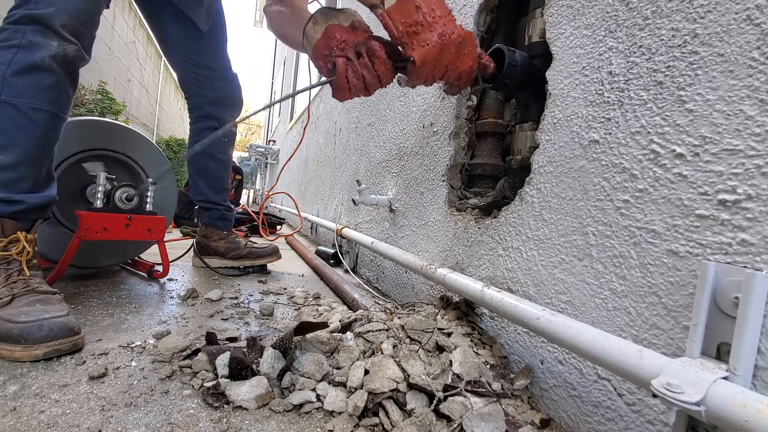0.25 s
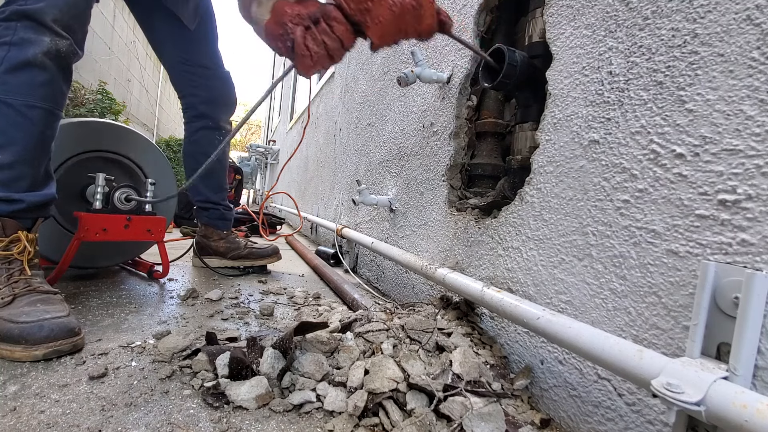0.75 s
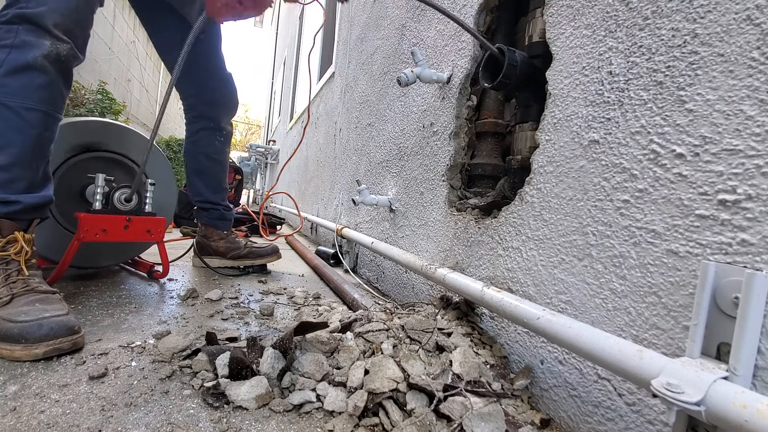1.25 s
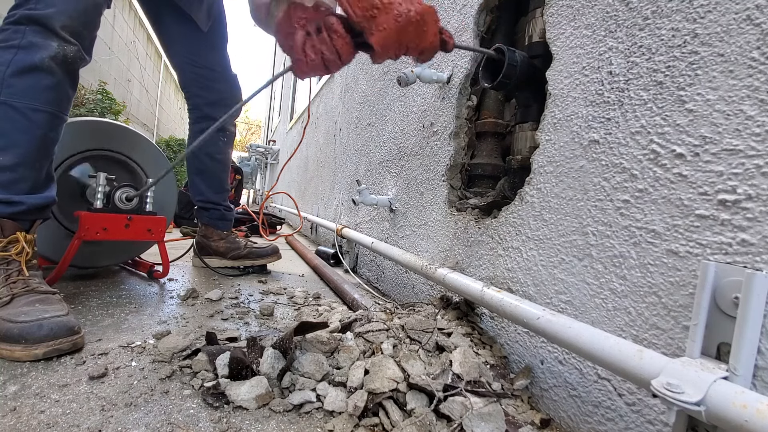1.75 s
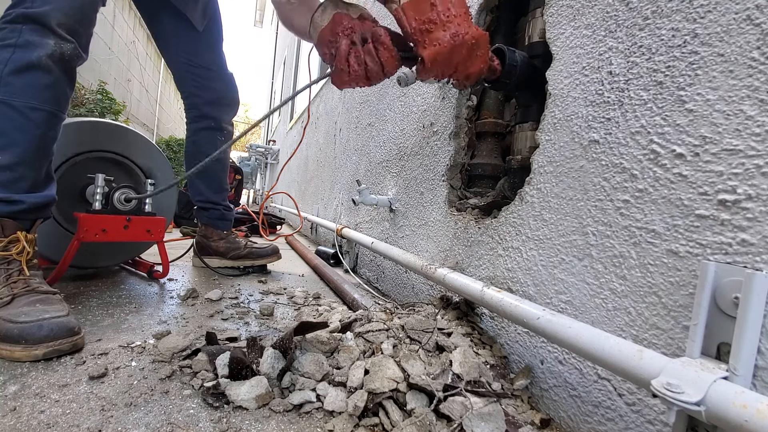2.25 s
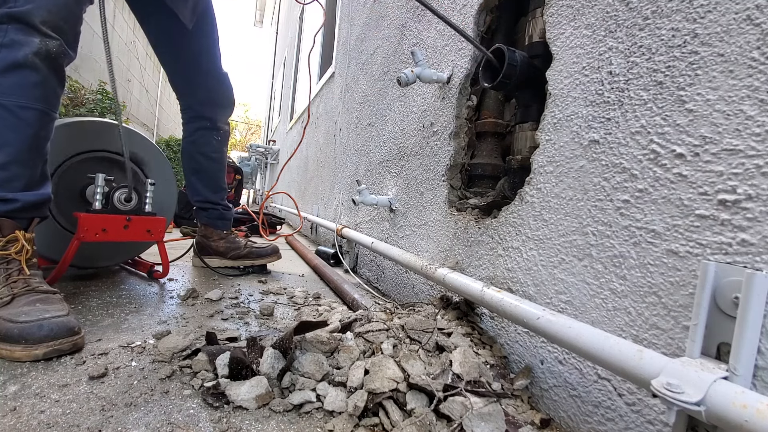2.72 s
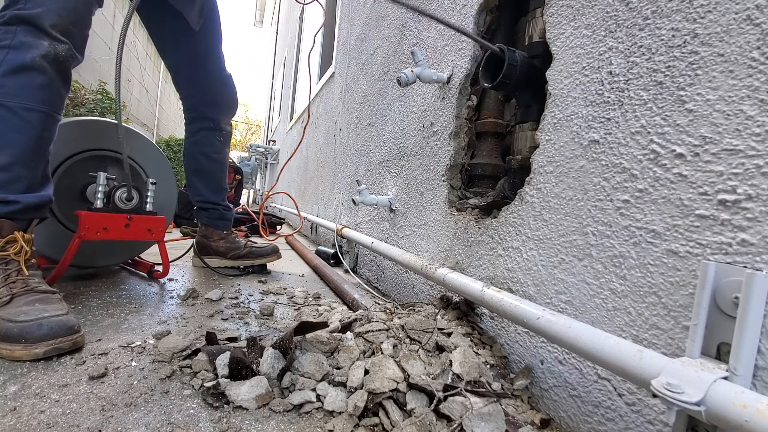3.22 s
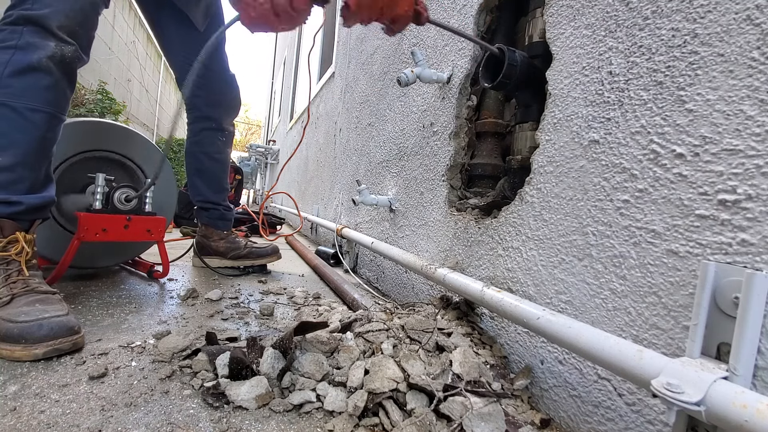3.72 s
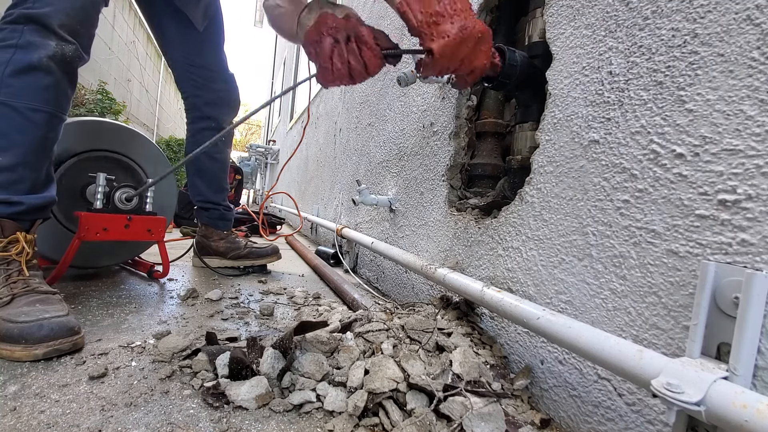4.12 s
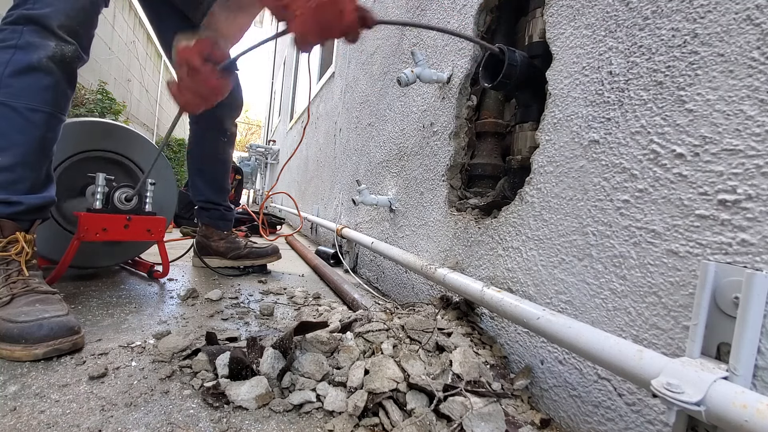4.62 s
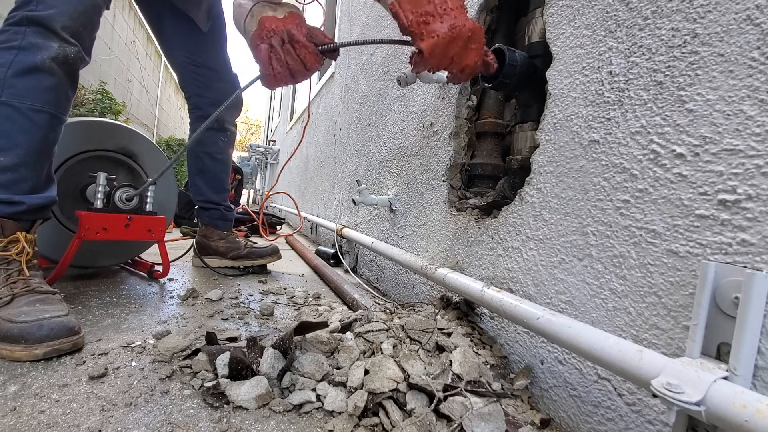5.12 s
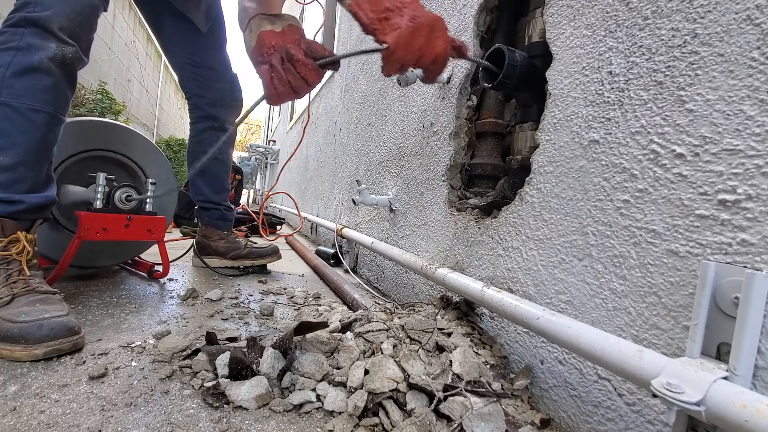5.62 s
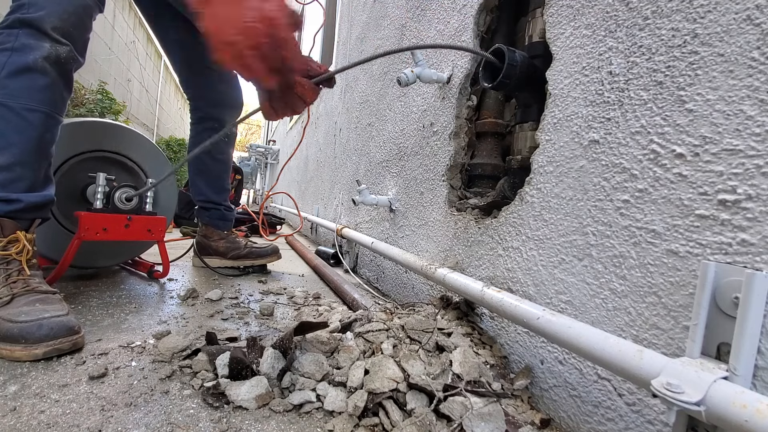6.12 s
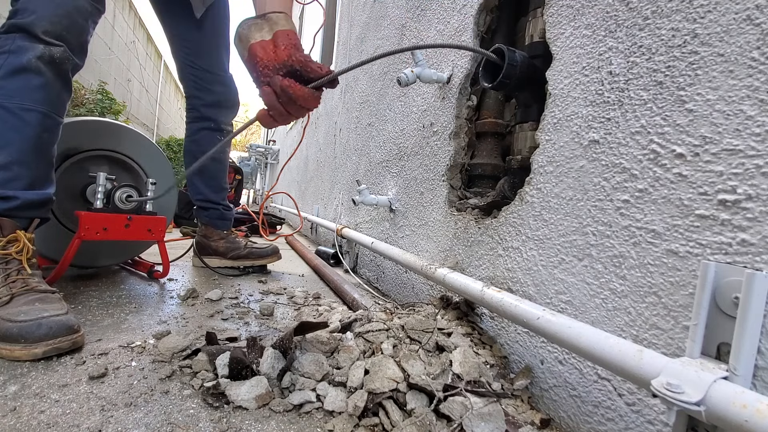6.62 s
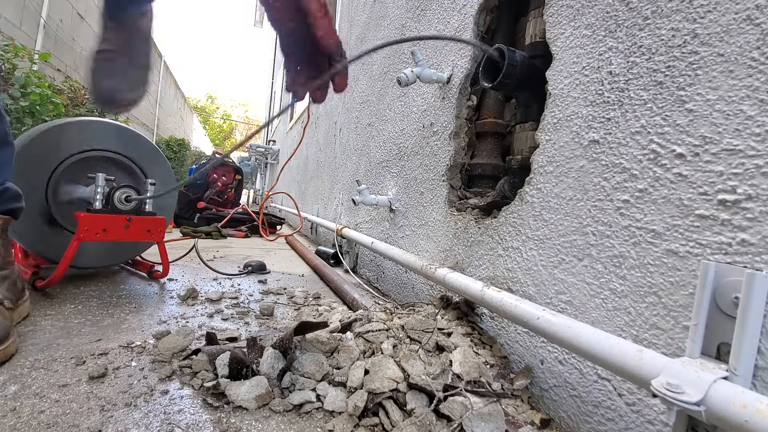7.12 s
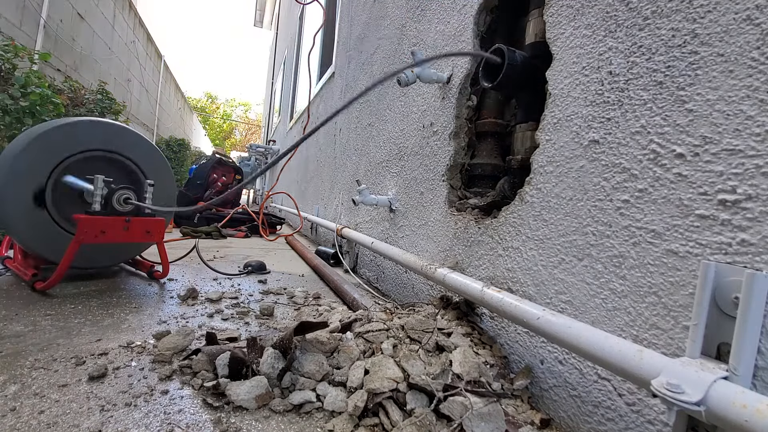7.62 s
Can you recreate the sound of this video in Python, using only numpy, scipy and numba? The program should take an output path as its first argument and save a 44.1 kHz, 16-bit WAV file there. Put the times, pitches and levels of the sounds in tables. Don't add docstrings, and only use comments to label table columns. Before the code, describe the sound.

Outdoors beside a hard wall, a drain-cleaning drum hums low with hollow knocks. Its cable buzzes quickly against a plastic pipe, then scrapes and taps. A second, shorter and higher zip follows, with more grinding. Later, rubber gloves scuff along the cable, bright ticks and gritty snaps sound, and an engine passes softly near the end. Close stereo microphone, short reflections.

```python
import sys
import numpy as np
from scipy import signal
from scipy.fft import rfft, irfft, next_fast_len
from scipy.io import wavfile
from scipy.ndimage import uniform_filter1d
from numba import njit

SR = 44100
rng = np.random.default_rng(int(sys.argv[2]) if len(sys.argv) > 2 else 0)


def wav_record(signal):
    frames = np.transpose(np.atleast_2d(signal))
    bounded = np.clip(frames, -1, 1)
    quanta = np.round(bounded * 32767).astype(np.int16)
    wavfile.write(sys.argv[1], SR, quanta)


def invert_db(level):
    return 10 ** (np.asarray(level, dtype=float) / 20)


N = 346273
T = np.arange(N) / SR


def unit(x):
    return x / np.sqrt(np.mean(x ** 2))


def through(x, response):
    size = next_fast_len(N + SR // 4)
    hz = np.arange(1, size // 2 + 2) * SR / size
    return unit(irfft(rfft(x, size) * response(hz), size)[..., :N])


def curve(f, shape):
    hz, value = np.transpose(shape)
    return np.interp(np.log(f), np.log(hz), value)


def colour(x, shape):
    return through(x, lambda f: invert_db(curve(f, shape)))


def mode(f, hz, width):
    return 1j * f * width / (hz ** 2 - f ** 2 + 1j * f * width)


def steep_modes(f, *rows):
    return sum(gain * mode(f, hz, width) ** 2 for gain, hz, width in rows)


@njit
def svf(x, hz, width):
    y, b, l = np.empty(len(x)), 0., 0.
    g, k = np.tan(np.pi * hz / SR), width / hz
    for i in range(len(x)):
        v = (b + g * (x[i] + 1e-18 - l)) / (1 + g * (g + k))
        b, l, y[i] = 2 * v - b, l + 2 * g * v, k * v
    return y


def noise():
    return rng.standard_normal(N)


def pair(own):
    return unit(noise() + own * rng.standard_normal((2, N)))


def walk(rate):
    k = int(SR / rate)
    held = np.repeat(rng.standard_normal(N // k + 1), k)
    return 1.3 * uniform_filter1d(uniform_filter1d(held, k), k)[:N]


def grit(rate, spread_db):
    size = np.minimum(rng.exponential(size=N), 2.5)
    return unit((rng.random(N) < rate / SR) * invert_db(spread_db * size))


def tone(hz, db, waver, swing_db):
    phase = np.cumsum(hz * (1 + waver * walk(22))) / SR
    return np.sqrt(2) * np.sin(2 * np.pi * phase) * invert_db(db + swing_db * walk(15))


def pings(events, rise_s, t60):
    out = np.zeros(N + SR)
    t = T[:SR // 5]
    for s, db, hz in events:
        start = int(s * SR)
        decay = invert_db(db - 60 * t / t60)
        out[start:start + len(t)] += decay * np.sin(2 * np.pi * hz * t) * np.minimum(t / rise_s, 1)
    return out[:N]


def bursts(times, dbs, hold_s, t60, rise_s):
    out = np.zeros(N + SR)
    t = T[:SR // 8]
    shape = np.minimum(t / rise_s, 1) * invert_db(-60 * np.maximum(t - hold_s, 0) / t60)
    for s, db in zip(times, dbs):
        start = int(s * SR)
        out[start:start + len(t)] += invert_db(db) * shape
    return out[:N]


def strokes(times, lengths, first_db, last_db):
    grip_db_per_s, let_go_db_per_s = 923, 634
    out = np.zeros(N)
    for s, length, a, b in zip(times, lengths, first_db, last_db):
        span = slice(max(int((s - .1) * SR), 0), int((s + length + .1) * SR))
        t = T[span] - s
        edges = grip_db_per_s * np.maximum(-t, 0) + let_go_db_per_s * np.maximum(t - length, 0)
        out[span] += invert_db(np.interp(t, [0, max(length, 1 / SR)], [a, b]) - edges)
    return out


def place(x, pan_db, lag, wet_db, reach_s):
    x = x * np.ones((2, 1)) * invert_db(np.array([[.5], [-.5]]) * pan_db)
    t = T[:int(.06 * SR)]
    echoes = rng.standard_normal((2, len(t))) * np.exp(-t / reach_s) * (t > .0006)
    echoes *= invert_db(wet_db) / np.sqrt(np.sum(echoes ** 2, axis=1, keepdims=True))
    echoes[0, lag] += 1
    echoes[1, 0] += 1
    return signal.fftconvolve(x, echoes, axes=1)[:, :N] / np.sqrt(1 + invert_db(2 * wet_db))


# time_s, drum_shake_db, motor_load_db
MACHINE_LOAD = [(0.0, -32.5, -48), (0.83, -27.5, -26.5), (0.89, -48, -43), (1.16, -37, -28),
                (2.21, -27.5, -51), (2.51, -28, -32), (2.64, -62, -43), (3.8, -26, -27), (3.98, -30.5, -41),
                (4.94, -36, -32), (5.14, -43, -62), (5.53, -32.5, -28.5), (6.34, -28.5, -37),
                (6.45, -28, -26), (6.58, -30, -34.5), (7.17, -29, -34), (7.5, -22.5, -30.5),
                (7.8, -30, -35)]
# time_s, firing_hz, firing_db, exhaust_hz, exhaust_db
PASSING_ENGINE = [
    (6.75, 113.2, -38, 205.4, -58),
    (6.9, 110.5, -35, 210.1, -46),
    (7.18, 109.7, -26.5, 227.9, -37.5),
    (7.299, 108.8, -28.5, 235, -34.5),
    (7.37, 99, -41, 238, -36),
    (7.44, 98, -36, 227.3, -30),
    (7.52, 101.8, -32, 225.3, -39.5),
    (7.62, 101.1, -26, 219.2, -31),
    (7.85, 97.6, -44, 221, -51),
]


def machine():
    s, *levels = np.transpose(MACHINE_LOAD)
    frame_db, mains_db = (np.interp(T, s, db) for db in levels)
    out = tone(69., frame_db - 11, waver=.05, swing_db=3.5)
    out = out + tone(120., mains_db - 9, waver=.04, swing_db=4.0)
    out = out + unit(svf(noise(), 66.1, 14.0)) * invert_db(frame_db - 3.0)
    out = out + unit(svf(noise(), 117.7, 14.6)) * invert_db(mains_db - 4.0)
    s, firing_hz, firing_db, exhaust_hz, exhaust_db = np.transpose(PASSING_ENGINE)
    for hz, db in ((firing_hz, firing_db), (exhaust_hz, exhaust_db)):
        out = out + tone(np.interp(T, s, hz), np.interp(T, s, db, left=-200), waver=.013, swing_db=2.)
    overtone_db = np.interp(T, s, exhaust_db, left=-200) - 8.0
    return out + tone(2 * np.interp(T, s, exhaust_hz), overtone_db, waver=.05, swing_db=4.0)


# freq_hz, density_db (per Hz)
YARD_TONE = [(12, -39), (20, -18.5), (71, 0.5), (94, -5), (156, -11.5), (314, -11), (404, -21),
             (566, -22.5), (652, -22), (1320, -38.5), (1430, -34.5), (2440, -42.5), (7730, -59),
             (15200, -46.5), (16500, -65)]
# freq_hz, likeness (1 = same left and right)
YARD_LIKENESS = [(60, 1), (130, 1), (290, 0.79), (640, 0.13), (1410, 0.0081), (3100, -0.086), (6820, 0.88),
                 (15000, -0.14)]
# time_s, swell_db
YARD_SWELL = [(0, 9.5), (.6, 8.5), (1.5, 9), (1.8, 16.5), (2.2, 0.5), (2.9, -2.5), (3.7, 12), (4.2, 8),
              (5.1, 3.5), (5.6, 10.5), (6.3, 11.5), (7, 12), (7.55, 16), (7.85, 9)]
RUMBLE_SHARE = 0.28


def yard():
    street_db = np.interp(T, *np.transpose(YARD_SWELL))
    rumble_db = RUMBLE_SHARE * street_db
    out, flutter = 0, walk(14)
    for hz in 24 * 2 ** np.arange(0, 9.5, .5):
        mid, side = (unit(svf(svf(noise(), hz, hz / 2), hz, hz / 2)) for _ in range(2))
        like = np.clip(-.12 + curve(hz, YARD_LIKENESS), -.9, .99)
        if hz < 650:
            swell_db = rumble_db * min(hz / 300, 1)
        else:
            swell_db = street_db * np.clip(1.2 - hz / 9000, 0, 1)
        band_db = curve(hz, YARD_TONE) + 10 * np.log10(hz)
        band = np.sqrt(1 + like) * mid + np.sqrt(1 - like) * side * np.array([[1], [-1]])
        out = out + invert_db(band_db + swell_db + 1.72 * walk(8.2) + 1.7 * flutter) * band
    return out * invert_db(-58.5)


# start_s, length_s, hiss_db, body_db
SCUFF_STROKES = [(0, 0.0096, -44.5, -34), (1.908, 0.025, -35, -36), (1.938, 0.062, -75, -42),
                 (4.321, 0.007, -52, -40), (4.355, 0.0051, -39.5, -35), (4.374, 0.029, -47.5, -46.5),
                 (4.42, 0.06, -39.5, -37), (4.549, 0.021, -32.5, -35), (4.606, 0.032, -31.5, -31.5),
                 (4.642, 0.027, -26, -28.5), (4.674, 0.058, -35, -32.5), (4.749, 0.026, -32, -32),
                 (4.779, 0.095, -40, -33.5), (5.606, 0.2, -53, -46.5), (6.709, 0.034, -28.5, -48),
                 (6.759, .01, -36, -59), (6.934, 0.0077, -46, -46), (6.976, .003, -58, -50),
                 (7.359, 0.019, -40, -52), (7.393, .008, -38, -39), (7.426, .02, -45, -58),
                 (7.495, 0.02, -41.5, -49), (7.721, 0.03, -43, -43), (7.784, 0.026, -59, -60),
                 (7.845, .01, -34.5, -56)]
# freq_hz, density_db (per Hz)
HISS_TONE = [(1470, -9), (2500, -2), (3550, -1), (4910, -2), (5390, 1.5), (7890, -1.5), (13400, -3),
             (16000, -7)]
# freq_hz, density_db (per Hz)
SCRAPE_TONE = [(88, -55), (150, -8.5), (328, 1), (382, -10), (531, -4.5), (689, -8), (1430, -16.5),
               (1850, -18.5), (3170, -28), (4000, -24), (5200, -35), (8800, -120)]


def scuffs():
    s, length, hiss_db, body_db = np.transpose(SCUFF_STROKES)
    hiss = colour(grit(4000, spread_db=0.5) * pair(own=0.97), HISS_TONE)
    hiss = hiss * strokes(s, length, hiss_db, hiss_db) * invert_db(3.0 + 2.07 * walk(110))
    body = colour(grit(3000, spread_db=2.0) * pair(own=0.74), SCRAPE_TONE)
    body = body * strokes(s, length, body_db, body_db) * invert_db(7.0 + 2.0 * walk(60))
    return hiss + body


# start_s, peak_db, pitch_hz
DRUM_KNOCKS = [(0.309, -23, 305), (0.385, -22, 200), (0.442, -20, 220), (0.923, -14, 283),
               (1.092, -21, 298), (1.863, -17.5, 298), (2.173, -22.5, 307), (2.405, -28, 298.4),
               (2.441, -31, 246.6), (2.738, -18.5, 234), (2.982, -18, 189), (3.215, -24, 317),
               (3.408, -25, 298), (3.632, -17, 246), (3.689, -25, 251), (3.876, -16.5, 313),
               (4.043, -18, 342), (4.432, -20, 290), (4.603, -18, 275), (4.623, -24, 288),
               (4.643, -14, 290), (4.655, -21, 388), (4.695, -21, 310), (4.899, -28, 285),
               (.002, -19.5, 248), (.012, -19, 320), (.198, -25, 320), (.272, -23, 350), (.475, -22, 350),
               (.55, -22, 262), (2.512, -11.5, 242), (2.537, -11.5, 269), (3.7, -15, 140),
               (3.745, -11.5, 140), (4.666, -9, 331), (4.753, -18, 250), (5.084, -30, 231),
               (5.119, -22, 249), (5.288, -26, 288), (5.509, -21.5, 330), (5.589, -23, 261),
               (5.951, -20.5, 304), (6.282, -21.5, 327), (7.316, -22, 229), (7.585, -22, 216.3)]
# start_s, peak_db
DRUM_CLUNKS = [(0.067, -23.5), (.004, -25), (.095, -26), (.19, -27), (.21, -31), (.31, -26.5), (.54, -30),
               (.585, -30), (4.575, -16.5), (7.53, -23.5), (0.411, -20.5), (.636, -30), (.908, -21),
               (1.697, -17), (1.793, -17.5), (1.907, -21.5), (2.06, -20.5), (2.177, -22.5), (2.24, -23.5),
               (2.473, -38), (2.519, -15), (2.713, -31), (3.069, -24.5), (3.724, -28), (4.208, -23.5),
               (4.328, -33), (4.549, -12.5), (5.21, -21.5), (7.47, -21.5), (7.55, -23), (7.6, -23),
               (7.67, -26)]


def knocks():
    rumble_db = RUMBLE_SHARE * np.interp(T, *np.transpose(YARD_SWELL))
    clunks = [(s, db, 532 + 20 * rng.standard_normal()) for s, db in DRUM_CLUNKS]
    lumps = grit(150, spread_db=2.3) * noise() * invert_db(.6 * rumble_db)
    shell = through(lumps, lambda f: steep_modes(f, (1, 292, 153), (0.86, 509, 106), (0.5, 404, 55)))
    low_rings = pings(DRUM_KNOCKS, rise_s=0.0031, t60=0.062) * invert_db(0.5)
    upper_rings = pings(clunks, rise_s=0.0019, t60=0.066) * invert_db(1.0)
    return low_rings + upper_rings + shell * invert_db(-39.5)


# start_s, peak_db, low_part_db
TURN_TICKS = [(.074, -35.5, -56.5), (.1974, -35, -51), (0.319, -31.5, -65), (1.13, -31, -48),
              (1.359, -34, -53), (1.4756, -32, -48), (1.5873, -40, -43), (1.698, -30.5, -28),
              (1.794, -35, -29), (2.145, -37, -68), (2.26, -27, -38), (2.3775, -40, -63),
              (3.313, -26.5, -31.5), (3.433, -26, -37), (3.5378, -24.5, -23.5), (3.6504, -21, -26),
              (3.764, -23.5, -24), (3.977, -28, -31), (4.0924, -25, -50), (4.2034, -26, -42),
              (4.434, -22.5, -25), (4.97, -33, -44), (5.084, -30, -46), (5.2022, -30.5, -39),
              (6.109, -20, -23), (6.2206, -17.5, -33), (6.335, -23.5, -43), (6.446, -30.5, -37),
              (6.5365, -39, -52)]
# start_s, peak_db
STRAY_SNAPS = [(.625, -41), (1.997, -32.5), (3.172, -33), (4.067, -33.5), (4.6024, -32), (5.934, -34.5),
               (5.953, -39), (6.145, -39), (6.411, -40), (6.684, -23), (6.7864, -45), (6.8205, -25.5),
               (6.88, -29.5), (6.697, -19.5), (6.723, -24), (6.738, -28), (6.802, -35), (6.926, -36),
               (6.939, -27.5), (6.9716, -36), (7.348, -31), (7.383, -24.5), (7.4347, -34), (7.725, -37),
               (7.775, -26.5), (7.789, -33), (7.8187, -43), (6.393, -41), (6.255, -38), (7.843, -30),
               (4.6206, -18), (.089, -37), (.6503, -50), (.672, -40), (.6777, -33), (.7132, -36),
               (.7501, -34), (.7745, -30), (.551, -44), (.396, -47), (.512, -46), (2.5126, -14.5),
               (4.542, -28.5), (1.897, -27), (1.548, -42), (1.815, -30), (3.22, -35)]
# freq_hz, density_db (per Hz)
TICK_TONE = [(2060, -64), (3500, -10.5), (4750, -3), (5440, 0), (7010, -5), (11100, -6), (12700, -8),
             (14000, -5), (16500, -12)]
# pitch_hz, under_tap_db
CABLE_RINGS = [(5380, -4), (6200, -15), (3485, -11.5)]


def ticks():
    snaps = [(s, db, db - 0.5) for s, db in STRAY_SNAPS]
    s, db, low_db = np.transpose(TURN_TICKS + snaps)
    bright = colour(pair(own=1.0), TICK_TONE) + 0.18 * unit(svf(noise(), 5900.0, 300.))
    low = unit(svf(noise(), 1880.0, 2700.0))
    ring_events = [(at, peak_db + under_db, hz)
                   for at, peak_db, _ in TURN_TICKS for hz, under_db in CABLE_RINGS]
    rings = pings(ring_events, rise_s=0.0015, t60=0.026)
    stray_time, stray_level = rng.random((170, 2)).T
    faint = bursts(stray_time * T[-1], -64.0 + 10.0 * stray_level, hold_s=0.004, t60=0.03, rise_s=0.002)
    tap_gain = bursts(s, db - 5.5, hold_s=0.0022, t60=0.031, rise_s=0.00067) + faint
    low_gain = bursts(s, low_db - 5.5, hold_s=0.0021, t60=0.046, rise_s=0.0035) + 3.37 * faint
    return bright * tap_gain + rings + low * low_gain


# pitch_hz, width_hz, level_db, left_minus_right_db
PIPE_MODES = [ (775, 130, 1.5, -2), (915, 170, -4, -2), (1070, 170, -9, -2), (1660, 260, -7.5, -2),
              (1930, 170, -6.5, -2), (2150, 300, -6, -2), (3570, 240, -13, -7), (3850, 230, -5.5, -8),
              (2700, 300, -17, 8), (4640, 490, -17.5, -9.5), (6200, 1100, -18, -11),
              (7560, 190, -18.5, -19), (9010, 210, -14, -2), (11100, 180, -25, -6), (12500, 360, -27, -4),
              (15600, 400, -24, 2), ]


def ring_pipe(x, widen):
    sides = np.array([[.5], [-.5]])

    def response(f):
        total = 0
        for k, (hz, width, db, pan_db) in enumerate(PIPE_MODES):
            total = total + (-1) ** k * invert_db(db + sides * pan_db) * mode(f, hz, widen * width) ** 2
        return total

    return through(x * np.ones((2, 1)), response)


# time_s, coil_rate_hz, pressure_db
FIRST_PUSH = [
    (.64, 75, -55),
    (.665, 80, -34),
    (.72, 86, -27),
    (.772, 104, -30.5),
    (.79, 118, -24),
    (.875, 168, -21.5),
    (.928, 151, -22.5),
    (1.045, 160, -26),
    (1.07, 150, -55),
]
# time_s, coil_rate_hz, pressure_db
SECOND_PUSH = [
    (2.431, 110, -26),
    (2.49, 150, -22),
    (2.525, 236, -21),
    (2.603, 384, -22.5),
    (2.632, 378, -21),
    (2.662, 296, -22.5),
    (2.708, 304, -23.5),
    (2.757, 252, -25.5),
    (2.79, 230, -48),
]
# freq_hz, density_db (per Hz)
RASP_TONE = [(2000, -11), (3000, -17), (3840, -3), (5210, -13.5), (6190, -7.5), (12600, -16.5),
             (13400, -23), (14900, -22), (15600, -14)]


def pushes():
    s, hz = np.transpose(FIRST_PUSH + SECOND_PUSH)[:2]
    hz = np.interp(T, s, hz)
    pressure = 0
    for push in (FIRST_PUSH, SECOND_PUSH):
        push_s, _, push_db = np.transpose(push)
        pressure = pressure + invert_db(np.interp(T, push_s, push_db, left=-200, right=-200))
    octaves = np.log2(hz / 150)
    unsteady = .014 + .09 * np.clip(-octaves, 0, 1)
    phase = np.cumsum(hz * (1 + unsteady * walk(90))) / SR
    coil = phase.astype(int)
    bumps = unit(np.diff(coil, prepend=0) * invert_db(1.5 * rng.standard_normal(N))[coil])
    gate = unit(np.exp(-(phase % 1) / .35) + .35)
    ring = ring_pipe(bumps + 0.48 * gate * pair(own=.7), widen=1.0) * invert_db(1.5 + 2.0 * walk(39.58))
    thrum = through(bumps + 0.53 * noise(), lambda f: steep_modes(
        f, (1, 346, 470), (0.72, 248, 95), (-0.62, 134, 140), (-.5, 572, 190)))
    rasp = colour(gate * pair(own=0.85), RASP_TONE)
    return pressure * (ring + thrum * invert_db(-1 - 4 * octaves) + rasp * invert_db(-3.5 + 2.5 * octaves))


# start_s, peak_db, loudest_ring_hz
PIPE_SLAPS = [(0.661, -42, 910), (1.166, -31, 1250), (1.184, -40, 937), (1.22, -29, 960),
              (2.436, -23, 935.3), (2.974, -20, 1120), (3.065, -28, 910), (3.075, -27, 960),
              (3.098, -31, 980), (3.178, -29, 1120), (3.292, -29.5, 2050), (3.34, -36, 1010),
              (3.441, -28, 1860), (3.453, -33, 1100), (2.446, -11, 910), (2.851, -26, 950),
              (3.472, -39, 950), (3.517, -41, 1770), (3.613, -27, 990), (3.711, -33, 1100),
              (3.74, -24, 945), (3.948, -29, 1880), (7.548, -13, 870), (7.572, -19.5, 910),
              (7.589, -21, 920), (7.669, -10.5, 1000), (7.5495, -22, 2070), (7.6693, -21, 2180)]
# start_s, peak_db, loudest_ring_hz
LIGHT_TAPS = [(1.211, -31, 950), (1.241, -21, 918), (1.277, -26, 937), (1.363, -34, 860), (1.454, -26, 939),
              (1.483, -28, 964), (1.588, -30, 964), (1.602, -25, 958), (1.632, -25, 1050), (1.69, -24, 907),
              (1.724, -21, 947), (1.805, -18, 829), (1.832, -26, 829), (2.991, -17, 1100),
              (3.045, -29, 950), (3.131, -30, 969), (3.221, -23, 945), (3.27, -29, 1090), (3.533, -25, 969),
              (3.561, -18, 942), (3.635, -15.5, 937), (3.678, -28, 842), (3.833, -29, 942),
              (3.848, -23, 945), (3.884, -23, 931), (3.923, -25, 1560)]


def slaps():
    hits = PIPE_SLAPS + [(s, db - 2.5, hz) for s, db, hz in LIGHT_TAPS]
    s, db, _ = np.transpose(hits)
    db = db - 4.9 * (np.arange(len(hits)) >= len(PIPE_SLAPS))
    body = ring_pipe(pair(own=1.0), widen=2.7) + .5 * colour(pair(own=0.18), HISS_TONE)
    chatter = body * bursts(s, db - 9.5, hold_s=0.0035, t60=0.023, rise_s=0.00039)
    return chatter + pings(hits, rise_s=0.00078, t60=0.029) * invert_db(-3.5)


# start_s, length_s, first_db, last_db, dull_above_ring_db
RIM_RUBS = [
    (1.166, 0.15, -61, -60, 17.5),
    (1.496, 0.17, -73, -59, 16),
    (1.669, 0.098, -58, -54, 13),
    (1.795, 0.043, -55.5, -53.5, 8.5),
    (2.853, 0.0079, -60, -45, 21),
    (2.993, 0.026, -44, -47.5, 16),
    (3.066, 0.26, -53.5, -56.5, 13),
    (3.35, 0.083, -88, -69, 13),
    (3.46, 0.31, -60.5, -52.5, 15),
    (3.783, 0.19, -55.5, -52, 12.5),
]


def rubs():
    s, length, first_db, last_db, dull_db = np.transpose(RIM_RUBS)
    slips = grit(700, spread_db=2.0) * pair(own=0.81)
    soft = through(slips, lambda f: (
        1 - 0.54 * mode(f, 2220, 700) - 0.38 * mode(f, 3690, 370) - .5 * mode(f, 8900, 700)))
    ring = ring_pipe(soft, widen=1.26) + 0.27 * colour(slips, RASP_TONE)
    ring = ring * strokes(s, length, first_db, last_db) * invert_db(16.5 + 4.0 * walk(60))
    dull = through(slips, lambda f: steep_modes(
        f, (1, 994, 450), (2.2, 940, 154), (0.14, 1280, 380), (0.17, 3900, 900), (1.9, 180, 370)))
    dull = dull * strokes(s, length, first_db + dull_db, last_db + dull_db)
    return ring + dull * invert_db(5.5 + 2.75 * walk(110))


# start_s, length_s, level_db, pitch_hz
SLIDE_SINGS = [(1.906, 0.026, -39, 5100), (2.989, 0.024, -34.5, 3750), (4.617, 0.054, -28.5, 5380),
               (4.755, 0.077, -39.5, 3640), (4.7, .09, -34, 1870), (4.602, .06, -37, 3470),
               (1.212, .08, -50, 4050), (1.66, .12, -50, 3650), (1.215, .11, -41, 1300),
               (1.166, .02, -36, 1300), (2.455, 0.014, -26.5, 790), (6.695, .02, -50, 6200),
               (6.714, 0.022, -34, 2930), (6.938, .01, -39.5, 2200), (7.775, 0.0051, -30.5, 2200),
               (8.5, 0.0032, -33, 2250), (8, 0.0044, -32.5, 2400), (5.955, 0.0048, -40, 1820),
               (6.148, .004, -46, 3840)]


def sings():
    out = 0
    for s, length, db, hz in SLIDE_SINGS:
        out = out + unit(svf(noise(), 1. * hz, 230.0)) * strokes([s], [length], [db], [db])
    return out * invert_db(1.3 * walk(70))


def scene():
    hum = place(machine(), pan_db=-1., lag=9, wet_db=-10.0, reach_s=.015)
    drum = place(knocks(), pan_db=-3.0, lag=8, wet_db=-4.5, reach_s=0.0087)
    hands = place(scuffs() + ticks() + sings(), pan_db=-1., lag=3, wet_db=-12.0, reach_s=.006)
    pipe = place(pushes() + slaps() + rubs(), pan_db=-1.2, lag=4, wet_db=-13.0, reach_s=.006)
    return hum + yard() + drum + hands + pipe


def band_limit(x):
    return signal.sosfilt(signal.butter(12, 16670, fs=SR, output="sos"), x)


def record(dry):
    top_filter = signal.ellip(9, .5, 36, 15800, fs=SR, output="sos")
    dim = signal.sosfilt(top_filter, dry)
    return band_limit(dim)


dry = scene()
out = record(dry)
wav_record(out)
```